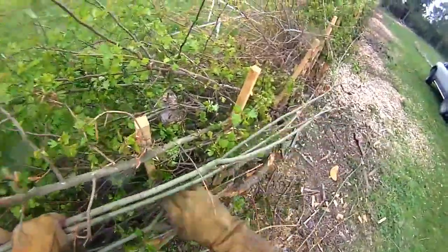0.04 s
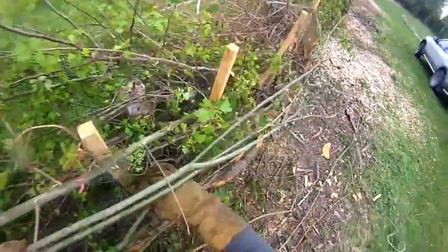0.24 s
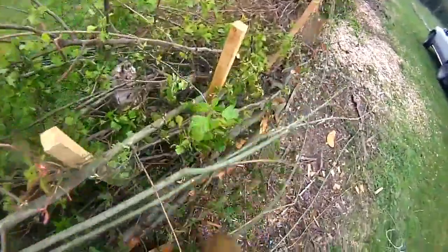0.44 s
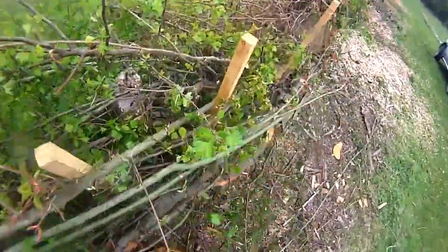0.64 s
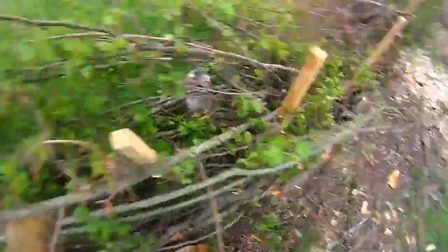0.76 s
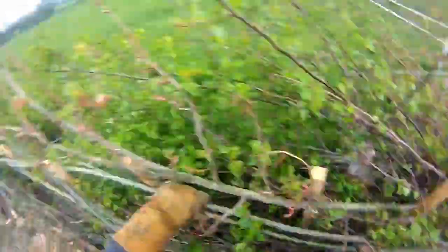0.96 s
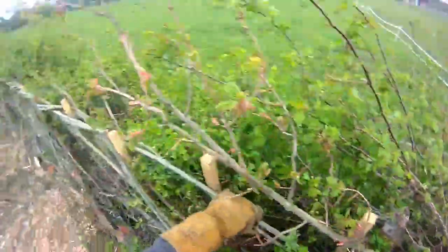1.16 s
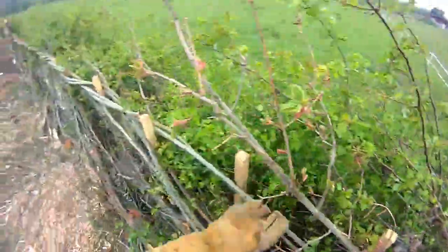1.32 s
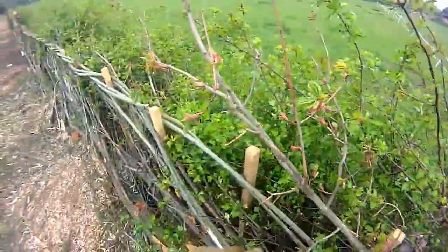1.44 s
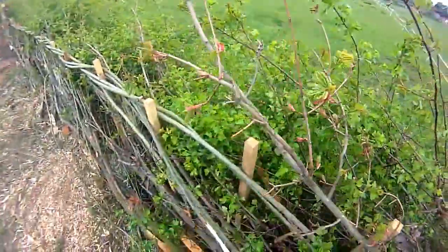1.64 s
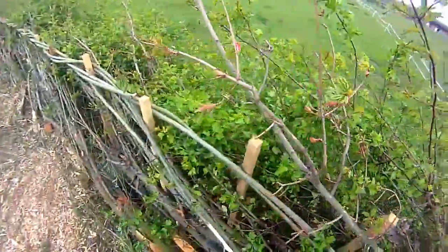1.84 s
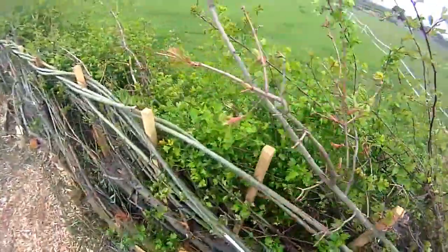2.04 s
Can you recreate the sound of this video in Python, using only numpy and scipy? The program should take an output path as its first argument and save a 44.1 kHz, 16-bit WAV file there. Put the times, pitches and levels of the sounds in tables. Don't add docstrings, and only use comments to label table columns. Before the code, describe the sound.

Brushing and cracking of hedge twigs, then one very loud hard click, amid wind rumble outdoors

```python
import sys
import numpy as np
from scipy import signal
from scipy.fft import rfft, irfft
from scipy.io import wavfile
from scipy.ndimage import uniform_filter1d, minimum_filter1d

SR = 44100
rng = np.random.default_rng(int(sys.argv[2]) if len(sys.argv) > 2 else 0)


def invert_db(x):
    u = np.asarray(x, float) / 20
    return 10 ** u


def output_pcm(signal):
    pcm = np.clip(np.atleast_2d(signal).T, -1, 1) * 32767
    wavfile.write(sys.argv[1], SR, np.round(pcm).astype(np.int16))


N = 91816


def in_time(rows):
    s, db = np.transpose(rows)
    return np.interp(np.arange(N) / SR, s, db)


def rms_one(x):
    return x / np.sqrt(np.mean(x ** 2) + 1e-20)


def colour(x, points):
    hz, db = np.transpose(points)
    f = np.arange(N // 2 + 1) * SR / N + 1
    gain = invert_db(np.interp(np.log(f), np.log(hz), db))
    return rms_one(irfft(rfft(x) * gain, N))


def high_pass(x, hz):
    return signal.sosfilt(signal.butter(2, hz, "high", fs=SR, output="sos"), x)


def drift(rate_hz):
    r = np.exp(-2 * np.pi * rate_hz / SR)
    walk = signal.lfilter([1], [1, -2 * r, r * r], rng.standard_normal(N + SR))
    return rms_one(walk[SR:])


def ring(x, hz, t60):
    r = invert_db(-60 / (max(t60, .002) * SR))
    w = 2 * np.pi * hz / SR
    return signal.lfilter([0, np.sin(w)], [1, -2 * r * np.cos(w), r * r], x + 1e-18)


# start_s, level_db
GUST_LEVEL = [(0.0, -26.5), (0.03, -44), (0.07, -32), (0.34, -33), (0.42, -29), (0.5, -34), (0.97, -37),
              (1.09, -31), (1.12, -27.5), (1.24, -32.5), (1.45, -30), (1.64, -36), (1.69, -28.5),
              (1.91, -32), (1.93, -29.5), (2.08, -31.5)]
# pitch_hz, density_db
WIND_SPECTRUM = [(12, 1.5), (20, 2.5), (119, -5), (214, -11.5), (541, -35), (595, -33), (1080, -41),
                 (1730, -45.5), (5800, -57), (7540, -100), (12800, -120)]
# start_s, peak_db, pitch_hz
BUFFETS = [
    (.41, -37, 63.3),
    (1.104, -24.5, 54.4),
    (1.179, -25.5, 90),
    (1.689, -32, 70),
    (1.80, -25.5, 74.4),
    (1.928, -26, 75.4),
]
BUFFET_CYCLES = 8.0


def wind():
    out = invert_db(in_time(GUST_LEVEL)) * colour(rng.standard_normal(N), WIND_SPECTRUM)
    t = np.arange(N) / SR
    for start_s, peak_db, hz in BUFFETS:
        u = np.maximum(t - start_s, 0) * hz / BUFFET_CYCLES * 7.0
        swell = np.e * u * np.exp(-u)
        out = out + invert_db(peak_db) * swell * np.sin(2 * np.pi * hz * (t - start_s))
    return out


def air():
    return invert_db(-34.5) * high_pass(colour(rng.standard_normal(N), WIND_SPECTRUM), 350)


# pitch_hz, density_db
BRUSH_SPECTRUM = [(180, -57), (300, -38.5), (494, 6), (566, -5.5), (1340, -4.5), (2100, -1), (4210, -7),
                  (5900, -11.5), (7670, -52), (13000, -120)]
GRAIN_HZ = np.geomspace(420, 5600, 16)
GRAINS_PER_S, GRAIN_SPREAD_DB, GRAIN_CYCLES = 5000, 4.0, 5
CLUMP_DB, SWISH_DB, PATCH_DB = 2.5, -6, 3.0


def grains():
    sizes = invert_db(GRAIN_SPREAD_DB * np.minimum(rng.exponential(1, N), 4)) * rng.choice([-1, 1], N)
    clump = invert_db(CLUMP_DB * drift(60))
    cracks = rms_one(sizes * (rng.random(N) < GRAINS_PER_S * clump / SR))
    dealt = rng.integers(0, len(GRAIN_HZ), N)
    swish = invert_db(SWISH_DB) * np.sqrt(clump / len(GRAIN_HZ)) * rng.standard_normal((2, N))
    rows = []
    for k, hz in enumerate(GRAIN_HZ):
        x = cracks * (dealt == k) + swish[k % 2]
        t60 = GRAIN_CYCLES / hz
        rung = ring(ring(x, hz, t60), hz, t60)
        rows.append(rms_one(invert_db(PATCH_DB * drift(25)) * rung))
    hz, db = np.transpose(BRUSH_SPECTRUM)
    gains = invert_db(np.interp(np.log(GRAIN_HZ), np.log(hz), db)) * np.sqrt(GRAIN_HZ)
    return gains[:, None] * np.array(rows) / np.sqrt(np.sum(gains ** 2))


# start_s, level_db
EFFORT = [(0.0, -64), (0.2, -59.5), (0.5, -52.5), (0.61, -48), (0.7, -48.5), (1.05, -60), (1.53, -66),
          (2.08, -70)]
# start_s, length_s, level_db, centre_hz, width_octaves
STROKES = [(0.0, 0.0043, -51, 3000, 1.7), (0.209, 0.01, -54, 1800, 1.4), (0.35, 0.043, -57, 1770, 0.69),
           (0.452, 0.052, -50.5, 1000, 1.3), (0.527, 0.051, -43.5, 1280, 2),
           (0.604, 0.026, -52, 3500, 0.86), (0.626, 0.012, -36.5, 2020, 3.7), (0.645, .032, -36, 1570, 4),
           (0.689, 0.037, -40.5, 1270, 4.1), (0.743, 0.033, -44, 1200, 3.9), (0.807, 0.024, -50, 2780, 0.3),
           (0.918, 0.02, -49, 2700, 0.38), (0.971, 0.081, -50.5, 2300, 0.84),
           (1.22, 0.016, -48.5, 2520, 0.4), (1.415, 0.15, -57.5, 2600, 0.51),
           (1.77, 0.015, -58.5, 2300, 0.24), (1.949, 0.011, -51, 2525, 0.38)]
STROKE_ATTACK_S, STROKE_RELEASE_S = .004, .01


def brush():
    out = invert_db(in_time(EFFORT) + 0.5) * grains().sum(axis=0)
    rows = grains()
    t = np.arange(N) / SR
    for start_s, length_s, db, hz, octaves in STROKES:
        attack = np.clip((t - start_s) / STROKE_ATTACK_S, 0, 1)
        release = np.exp(-np.maximum(t - start_s - length_s, 0) / STROKE_RELEASE_S)
        favour = np.exp(-.5 * (np.log2(GRAIN_HZ / hz) / octaves) ** 2)
        out = out + invert_db(db) * attack * release * rms_one(favour @ rows)
    return high_pass(out, 300)


def struck(events, modes, contact_s, spread_db):
    s, db, upper_db = np.transpose(events)
    vary = rng.standard_normal((len(s), len(modes)))
    out, decay = 0, np.exp(-1 / (contact_s * SR))
    for k, (hz, level_db, t60) in enumerate(modes):
        hits = np.zeros(N)
        upper = upper_db * (hz > 3000)
        hits[(s * SR).astype(int)] = invert_db(db + spread_db * vary[:, k] + upper)
        pole = decay * np.exp(2j * np.pi * hz / SR)
        burst = 2 * signal.lfilter([1 - decay], [1, -pole], hits + 1e-18).real
        out = out + (-1) ** k * invert_db(level_db - 7.5) * ring(burst, hz, t60)
    return out


# start_s, peak_db, upper_modes_db
CLICKS = [(.1276, -17.5, 9.5), (.1335, -38, 14), (.140, -58, 0), (.4369, -21.5, 5), (1.1109, -11, 7),
          (1.1145, -17, 8), (1.1225, -31.5, -5), (1.2772, 0.5, 3.5), (1.2902, -7, 6), (1.2932, -10.5, 2.5),
          (1.2968, -14, -10), (1.3025, -15, -6), (1.306, -30.5, -1), (1.5434, -20.5, 9), (1.9555, -35, 7)]
# pitch_hz, level_db, t60_s
MOUNT_MODES = [(2333, 1, 0.025), (2733, 2, 0.017), (2300, -27.5, 0.091), (2700, -20, 0.085),
               (2030, -11, 0.017), (3377, -15, 0.015), (4235, -18.5, 0.0092), (1520, -30.5, .012),
               (2142, -9.5, 0.052), (2640, -25.5, 0.043)]


def mount():
    return high_pass(struck(CLICKS, MOUNT_MODES, contact_s=.0004, spread_db=2.4), 1300)


# start_s, peak_db, pitch_hz, t60_s
SNAPS = [(0.217, -46, 1680, .01), (0.484, -35, 1200, 0.011), (0.512, -39, 3300, 0.022),
         (.648, -26, 5170, 0.0053), (0.665, -29, 4800, 0.02), (0.671, -25, 3700, 0.0039),
         (.752, -29.5, 3050, 0.014), (0.7662, -20.5, 3000, 0.016), (1.003, -39, 2200, 0.0085),
         (1.0198, -32.5, 2430, 0.0067), (1.072, -45, 3500, .01), (.627, -34, 2300, .02),
         (1.045, -40.5, 2400, 0.013)]
SNAP_CYCLES = 5


def snaps():
    out, size = np.zeros(N + SR), 2048
    t = np.arange(size) / SR
    for (start_s, peak_db, hz, t60), noise in zip(SNAPS, rng.standard_normal((len(SNAPS), size))):
        burst = noise * invert_db(-60 * t / max(t60, .002))
        crack = ring(ring(burst, hz, SNAP_CYCLES / hz), hz, SNAP_CYCLES / hz)
        crack = crack / abs(crack).max() + 0.088 * burst
        first = int(start_s * SR)
        out[first:first + size] += invert_db(peak_db + 1.0) * crack
    return out[:N]


# start_s, peak_db, upper_modes_db
TICKS = [
    (.8824, -39, -1),
    (.885, -44, 5.5),
    (.9133, -40, -3),
    (.9168, -32, -1),
    (.9195, -44, 2),
]
# pitch_hz, level_db, t60_s
STAKE_MODES = [(4370, 8.5, 0.018), (1057, 1, 0.026), (2650, -3.5, .015)]


def stake():
    return struck(TICKS, STAKE_MODES, contact_s=0.00025, spread_db=1.0)


def scene():
    mid = wind() + air() + brush() + mount() + snaps() + stake()
    return np.array([mid, mid])


def holed(x, share, band_hz, spare_db, above_hz):
    f, _, cells = signal.stft(x, SR, nperseg=1024, boundary="even")
    band = (f / band_hz).astype(int)
    power = abs(cells[0]) ** 2
    power = np.array([power[band == b].mean(axis=0) for b in range(band.max() + 1)])
    keep = (rng.random(power.shape) > share) | (power > invert_db(2 * spare_db))
    kept = cells * (keep[band] | (f < above_hz)[:, None])
    return signal.istft(kept, SR, nperseg=1024)[1][:, :N]


# pitch_hz, density_db
GRIT_SPECTRUM = [(300, -24.5), (700, -3.5), (1500, -3.5), (2800, -5), (5500, -1.5), (10000, -9),
                 (15000, -2)]
GRIT_DB, GRIT_GAP_SHARE = -22.5, 0.44
HUSH_S, HUSH_DB, HUSH_HZ, HOLE_SHARE = 0.0099, -17, 3500, .28


def camera_grit(x):
    level = np.sqrt(uniform_filter1d(high_pass(x[0], 700) ** 2, size=256) + 1e-12)
    grit = np.array([colour(w, GRIT_SPECTRUM) for w in rng.standard_normal((2, N))])
    both, apart = invert_db(GRIT_DB) * level * grit
    apart = holed(apart[None], GRIT_GAP_SHARE, 900, spare_db=-82, above_hz=0)
    x = x + both + apart * [[1], [-1]]
    span = int(HUSH_S * SR)
    ahead = np.r_[level[span:], np.zeros(span)]
    before = -minimum_filter1d(-ahead, size=span, origin=span // 2 - 1) > 8.0 * level
    hush = uniform_filter1d(np.where(before, invert_db(HUSH_DB), 1.), size=64)
    cut = signal.butter(4, HUSH_HZ, "high", fs=SR, output="sos")
    hushed = x - (1 - hush) * signal.sosfiltfilt(cut, x)
    return holed(hushed, HOLE_SHARE, 410, spare_db=-84, above_hz=5200)


def roll_off(x):
    return signal.sosfilt(signal.butter(12, 16560, fs=SR, output="sos"), x)


LIMIT, EDGE_HZ, TOP_HZ = .95, 6110, 15640


def record(dry):
    limited = LIMIT * np.tanh(dry / LIMIT)
    x = signal.sosfilt(signal.cheby2(8, 30, EDGE_HZ + 500, fs=SR, output="sos"), limited)
    slow = signal.resample_poly(x, 40, 147, axis=1, padtype="reflect")
    held = np.repeat(slow, 4, axis=1)
    x = camera_grit(signal.resample_poly(held, 147, 160, axis=1, padtype="reflect")[:, :N])
    x = signal.sosfilt(signal.cheby2(12, 70, TOP_HZ + 800, fs=SR, output="sos"), x)
    return roll_off(x)


dry = scene()
out = record(dry)
output_pcm(out)
```